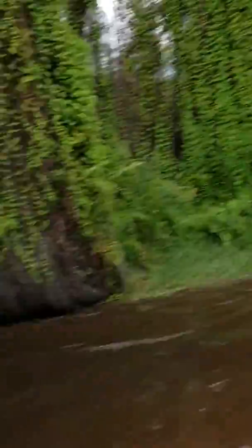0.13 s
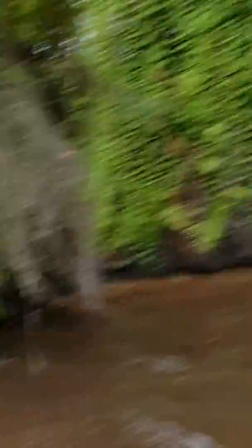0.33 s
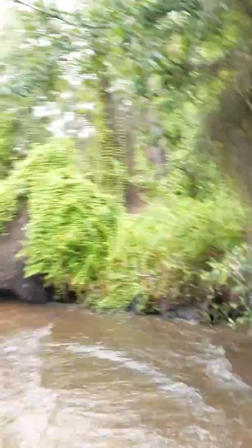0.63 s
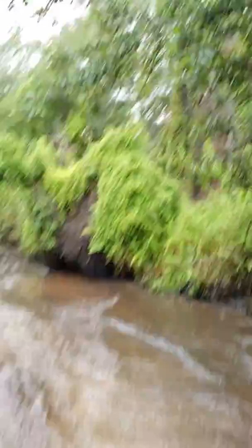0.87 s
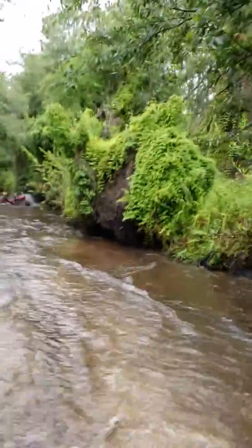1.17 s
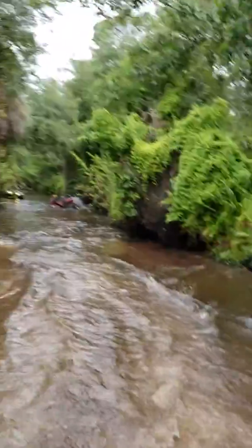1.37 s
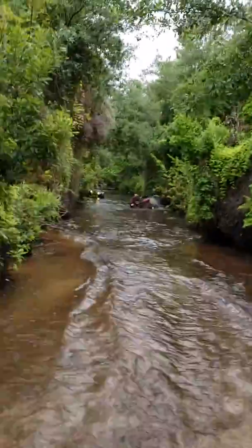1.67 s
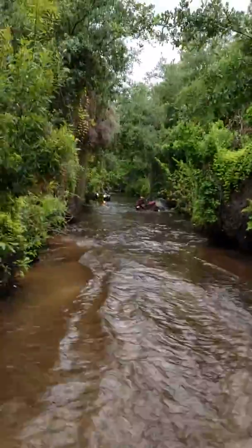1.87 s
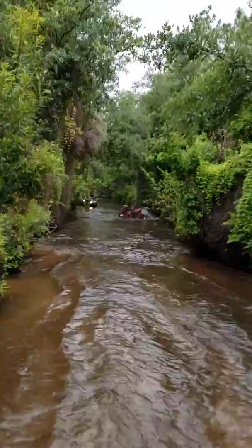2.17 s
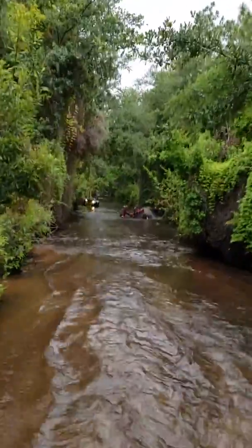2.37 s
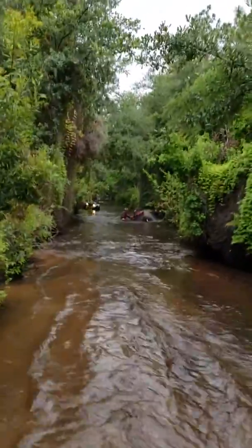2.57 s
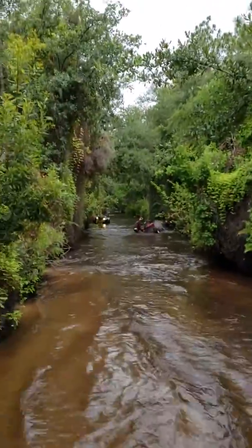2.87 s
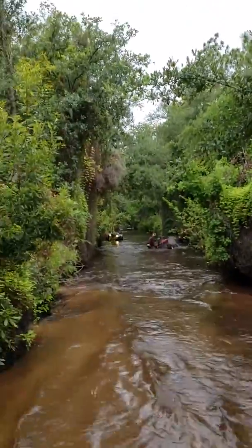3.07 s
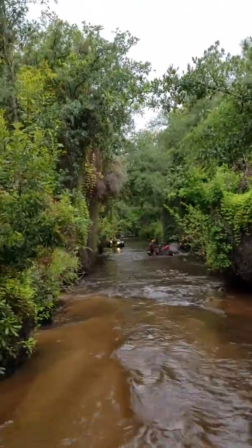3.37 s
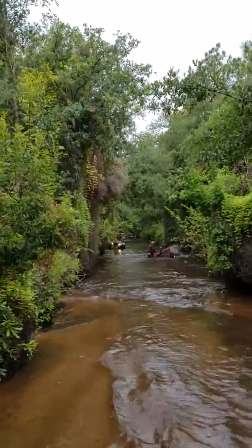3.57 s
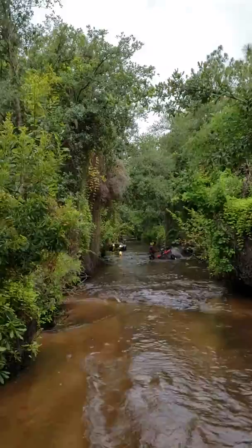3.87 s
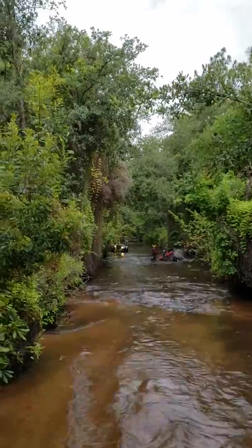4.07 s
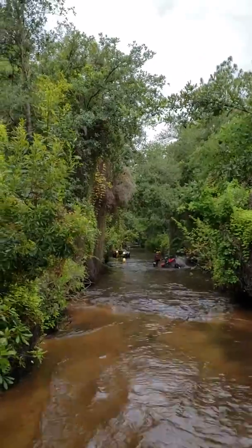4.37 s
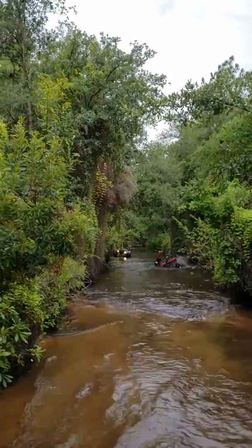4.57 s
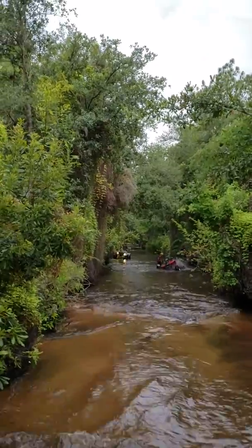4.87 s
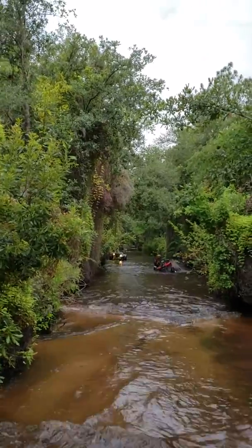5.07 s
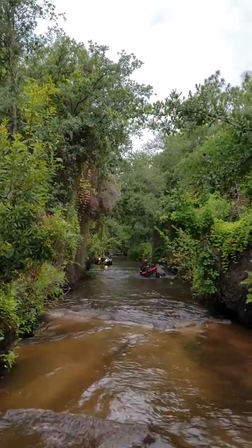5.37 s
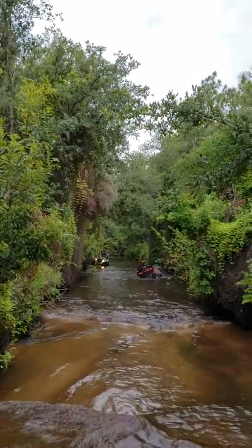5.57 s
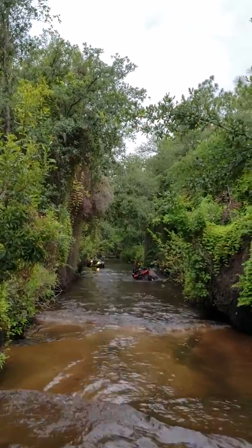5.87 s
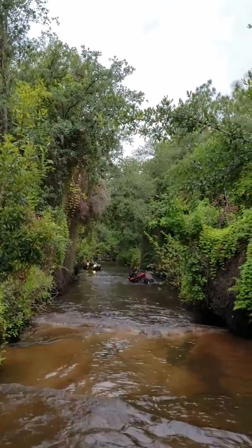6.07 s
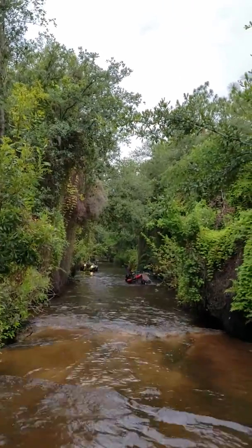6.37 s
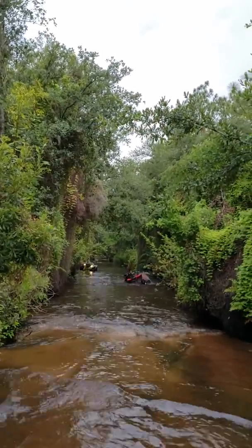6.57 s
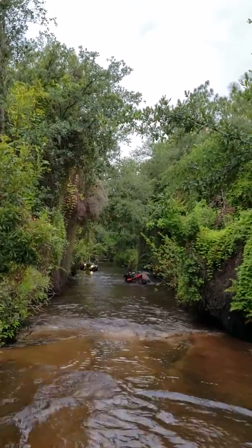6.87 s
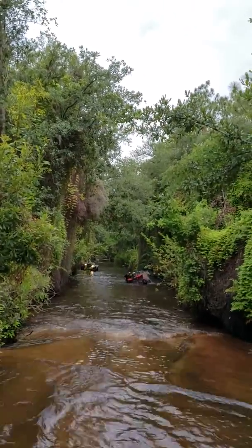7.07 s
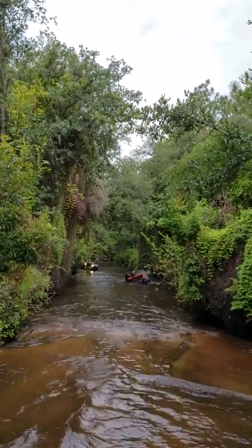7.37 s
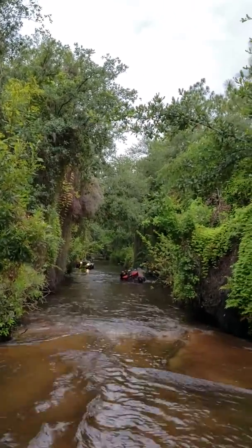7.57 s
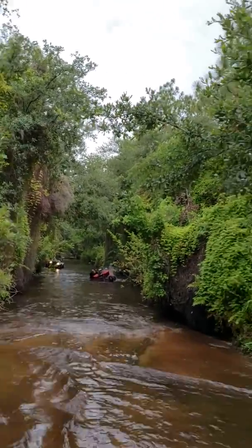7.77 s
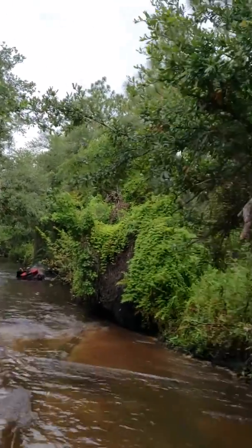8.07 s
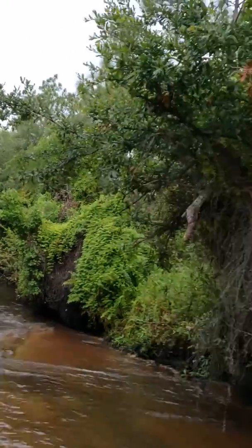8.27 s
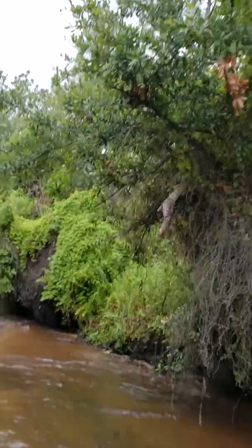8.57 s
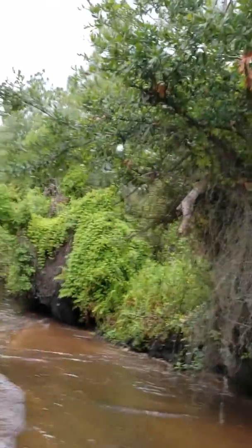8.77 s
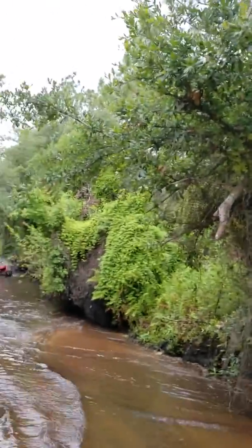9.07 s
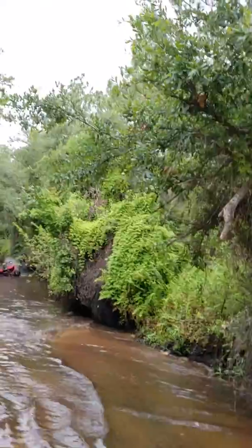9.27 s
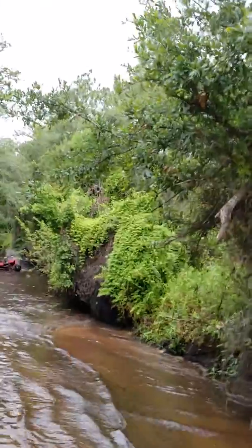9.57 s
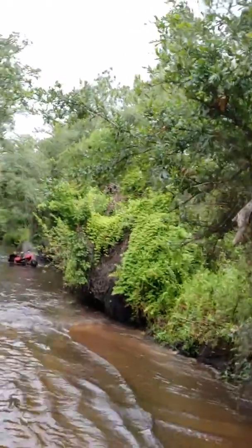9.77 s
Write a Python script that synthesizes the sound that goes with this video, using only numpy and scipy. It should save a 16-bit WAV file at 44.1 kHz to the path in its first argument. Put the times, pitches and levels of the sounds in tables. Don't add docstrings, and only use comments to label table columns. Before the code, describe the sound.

A close quad bike revs briefly with a humming frame and strong spray, then falls by one second to a deep, lumpy idle. A softer far engine putters rapidly behind it. Water spits, slops and splashes scatter around the wheels. Late on the far engine slows to duller, separate pops. Outdoor wooded creek, short bank reflections, two-port phone, both engines slightly right.

```python
import sys
import numpy as np
from scipy import signal
from scipy.fft import rfft, irfft
from scipy.io import wavfile
from scipy.ndimage import uniform_filter1d

SR = 44100
rng = np.random.default_rng(int(sys.argv[2]) if len(sys.argv) > 2 else 0)


def generate_wav(signal):
    frames = np.transpose(np.atleast_2d(signal))
    scaled = np.clip(frames, -1, 1) * 32767
    pcm = np.round(scaled).astype(np.int16)
    wavfile.write(sys.argv[1], SR, pcm)


def rack_gain(trim_db):
    fader = np.asarray(trim_db, float)
    return 10 ** (fader / 20)


N = 437472
T = np.arange(N) / SR
LOADED_RPM = 950

# (time [s], speed [rpm])
NEAR_RPM = [(0.0, 1222.3), (0.4, 1165.9), (0.8, 1126.9), (1.02, 803.1), (1.49, 811.0), (2.15, 742.7),
            (2.56, 775.5), (2.89, 727.1), (3.56, 737.4), (4.04, 691.7), (4.62, 725.1), (5.36, 741.1),
            (6.28, 713.0), (6.72, 773.9), (7.26, 717.7), (8.54, 739.4), (9.05, 677.0), (9.92, 725.3)]
# (time [s], airbox thump level [dB])
NEAR_LOAD = [(0, -50), (.3, -24), (.6, -19.5), (.8, -21.5), (.88, -38), (1.1, -13.5), (2, -14.5),
             (2.9, -17), (3.2, -14), (6.75, -11.5), (6.86, -22), (6.94, -12), (7.02, -21), (7.1, -10),
             (7.18, -19), (7.27, -12), (9.92, -13)]
# (speed [rpm], airbox [Hz], exhaust [Hz])
THUMP_HZ = [(667, 71, 81.5), (1080, 86, 86.5)]
# (order of the crank [1], level [dB], lag [cycles])
HUM = [(3, -19, .1), (4, -22, 0.57), (5, -1, 0.074), (17, -20, 0.3)]
FIRES_AT_TURN = (.9, .94)
# (time [s], exhaust thump level [dB])
STRAYS = [(.873, -30), (1.225, -15.5), (1.593, -18), (2.769, -18), (3.344, -21), (3.839, -25), (4.009, -14),
          (4.182, -9), (4.351, -14), (4.442, -26), (4.768, -24), (5.584, -13), (5.665, -20), (5.748, -19),
          (5.83, -22), (5.913, -10), (5.998, -12), (6.081, -14), (6.412, -18), (7.048, -17), (7.213, -18),
          (7.383, -11), (7.544, -23), (7.716, -20), (8.866, -17), (9.04, -13), (9.389, -12), (9.562, -9),
          (9.729, -10), (9.897, -8)]
# (time [s], speed [rpm])
FAR_RPM = [(0.0, 4773.8), (1.13, 4846.7), (1.69, 4740.3), (2.18, 4914.1), (2.45, 4806.7), (2.94, 4424.9),
           (3.51, 4621.4), (4.23, 4800.4), (4.49, 4780.6), (5.05, 4472.8), (5.63, 4507.2), (6.07, 4408.9),
           (6.62, 4564.6), (6.91, 4428.9), (7.78, 3461.7), (8.4, 3387.2), (9.19, 3657.8), (9.92, 3124.8)]
# (time [s], pop level [dB], pipe echo share [0-1], throttle [0-1], tailpipe facing us [0-1])
FAR_POP = [(0, -35.5, 1, 0.86, 0.9), (.77, -36, 0.73, 0, .1), (1.52, -36, 0.73, 0.3, 0.29),
           (1.9, -37, 0.84, 0.3, 0.24), (2.24, -34.5, 0.5, 0.98, 0.45), (2.73, -32, 0.41, 0.54, 0.2),
           (2.87, -35.5, 0.33, 1, 0.8), (3.04, -32.5, 0.48, 0.6, 0.24), (4.03, -32, 0.58, 0.92, 0.4),
           (4.23, -30.5, 0.43, 1, 0.28), (4.7, -31, 0.48, 0.9, 0.2), (5.25, -29.5, 0.17, 0.94, 0.6),
           (5.33, -29.5, 0.19, 0.6, .8), (5.52, -30.5, 0.39, 0.89, 0.36), (6.66, -30, 0.47, 0.95, 0.5),
           (7.84, -33.5, 0.23, 0.5, 0), (9.25, -28.5, .2, 0.7, 0.85), (9.92, -32.5, 0.12, 0, 0.54)]
# (frequency [Hz], width [Hz], level [dB])
PIPE = [
    (144, 33, -7),
    (202, 51, -12),
    (321.1, 19.1, -8.5),
]
# (frequency [Hz], density [dB per Hz])
ROAR = [(20, -24), (45, 2.5), (100, -11), (200, -5), (300, -16.5), (450, -20), (750, -28), (1100, -32),
        (1650, -33), (2600, -53.5), (4000, -52), (5200, -64)]
# (frequency [Hz], density [dB per Hz])
HISS = [(1470, -1), (2500, -0.5), (2790, -5), (4640, -8.5), (7410, -4.5), (8460, -12), (10500, -9),
        (11700, -3), (12700, -6), (14300, -3), (15200, -3), (16200, -20)]
# (time [s], spray level [dB], wash and roar level [dB])
CHURN = [
    (0, -38.5, -49),
    (.4, -44.5, -45),
    (.85, -42.5, -49),
    (1.21, -49, -49),
    (2.4, -52.5, -53.5),
    (3.4, -50, -48.5),
    (7.6, -50.5, -49.5),
    (8.3, -48.5, -49),
    (9.92, -51, -49),
]
# (time [s], length [s], level over the hiss [dB])
SPLASHES = [(2.46, .02, 7), (2.702, 0.088, 5), (2.998, .03, 2), (3.414, .04, 2.5), (4.3, .1, 0),
            (4.52, .03, 2), (6.8, 0.022, 3.5), (7.987, 0.032, 7.5), (8.3, 0.047, 0), (8.505, .05, -0.5),
            (9.92, 0.033, 9)]
# (time [s], length [s], frequency [Hz], level [dB])
SLOPS = [(0.01, 0.074, 1600, -33.5), (.35, .12, 1560, -41), (.03, 0.31, 2510, -48),
         (0.065, 0.046, 844, -37), (0.327, 0.14, 800, -39.5), (2.702, 0.059, 2530, -55),
         (5.086, .06, 1970, -45.5), (4.3, 0.4, 2560, -56), (5.487, 0.048, 1940, -48),
         (6.795, 0.19, 1630, -46), (8.266, 0.16, 1660, -49), (8.8, 0.32, 1320, -46)]
# (time [s], peak level [dB])
SPITS = [(1.0141, -29), (2.3231, -41), (2.444, -23), (2.5551, -32), (2.6543, -27), (2.6923, -28),
         (2.9442, -38), (3.012, -22), (3.3907, -35), (3.7099, -33), (3.7957, -41), (4.5565, -37),
         (4.8868, -31), (5.3747, -36), (6.313, -28), (7.418, -38), (7.664, -35), (7.8301, -33),
         (7.9443, -32), (8.1094, -29), (8.2761, -40), (8.6467, -39), (8.9016, -30), (9.1635, -37),
         (9.4255, -42), (9.5113, -37), (9.5986, -34), (9.7123, -39)]
# (frequency [Hz], left-right likeness [0-1])
SAME = [(60, 1), (300, 0.96), (700, 0.83), (1400, 0.3), (3000, 0.017), (15000, 0.015)]
# (frequency [Hz], left minus right [dB])
LEAN = [(60, -1.5), (120, -1.0), (240, 0.0), (480, -1.5), (950, -2.0), (1890, -1.5), (3770, -0.5),
        (7520, -2.5), (15000, -5.0)]


def evened(x):
    return x / np.sqrt(np.mean(x ** 2) + 1e-20)


def read(points, hz):
    f, value = np.transpose(points)
    return np.interp(np.log(hz + 1), np.log(f + 1), value)


def curves(rows):
    s, *columns = np.transpose(rows)
    return [np.interp(T, s, c) for c in columns]


def between(ends, share):
    return ends[0] + (ends[1] - ends[0]) * np.clip(share, 0, 1)


def ring(x, hz, width):
    r = np.exp(-np.pi * width / SR)
    return signal.lfilter([1], [1, -r * np.exp(2j * np.pi * hz / SR)], x + 0j).imag


def later(x, ms):
    return np.interp(T - ms / 1000, T, x, left=0)


def thump(dt, hz, length):
    return -np.cos(2 * np.pi * hz * dt) * np.exp(-.5 * (dt * hz / length) ** 2)


def noise(spectrum, patchy_db):
    frames, hz = N // 256 + 5, np.fft.rfftfreq(1024, 1 / SR)
    a, b, c, d, patches = rng.standard_normal((frames, 513, 5)).T
    patches = uniform_filter1d(patches, size=14, axis=0)
    patches = evened(uniform_filter1d(patches, size=10, axis=1))
    same = np.clip(read(SAME, hz), -1, 1)[:, None]
    left, other = a + 1j * b, c + 1j * d
    z = np.array([left, same * left + np.sqrt(1 - same ** 2) * other])
    z *= rack_gain(read(spectrum, hz)[:, None] + patchy_db * patches)
    return evened(signal.istft(z, nperseg=1024, noverlap=768)[1][:, :N])


def crank():
    return np.cumsum(curves(NEAR_RPM)[0]) / 60 / SR + .028


def frame_hum():
    turns = crank()
    hum_db = between((-27, -17.5), (curves(NEAR_RPM)[0] - 720) / 300)
    return sum(rack_gain(hum_db + db) * np.cos(2 * np.pi * (round(k) * turns - lag)) for k, db, lag in HUM)


def wash_roar():
    roar = noise(ROAR, patchy_db=2.0) * rack_gain(curves(CHURN)[1] + 24.5)
    deep = signal.sosfilt(signal.butter(2, 1000, fs=SR, output="sos"), roar)
    return roar - deep * np.clip(1 - (curves(FAR_RPM)[0] / 4400) ** 0.46, 0, 1)


def spray():
    hiss = noise(HISS, patchy_db=1.03)
    top = signal.sosfiltfilt(signal.butter(2, 9000, "high", fs=SR, output="sos"), hiss)
    gusts = uniform_filter1d(rng.standard_normal(N), size=900)
    gusts = evened(uniform_filter1d(gusts, size=900))
    breath = np.exp(-((crank() - .3) % 1) / 0.56)
    drops = rack_gain(4.4 * np.minimum(rng.exponential(1, N), 4.5)) * (rng.random(N) < 90 / SR)
    drops = 0.12 * evened(signal.oaconvolve(drops, np.exp(-np.arange(600) / 77.0))[:N])
    splash_db = sum(db * np.exp(-.5 * ((T - s) / long) ** 2) for s, long, db in SPLASHES)
    puffs = top * (rack_gain(1.1 * gusts + 2.0 * breath + .5 * splash_db - 1.5) - 1)
    level = rack_gain(curves(CHURN)[0] + .4 * splash_db + 3.5 + 2.8 * breath) * (1 + drops)
    hits = spits()
    return (hiss + puffs) * (level + .4 * hits) + .9 * top * hits


def slops():
    froth, out = rng.standard_normal((2, N)), np.zeros((2, N))
    for s, long, hz, db in SLOPS:
        part = abs(T - s) < 3 * long
        swell = np.exp(-.5 * ((T[part] - s) / long) ** 2)
        out[:, part] += rack_gain(db) * swell * evened(ring(froth[:, part], hz, width=105))
    return out


def banks(x):
    t = np.arange(9000) / SR
    taps = rng.standard_normal((2, 9000)) * (rng.random((2, 9000)) < .05)
    taps *= rack_gain(-60 * t / 0.75) * (t > .008)
    return signal.oaconvolve(x[None], taps / np.linalg.norm(taps[0]), axes=1)[:, :N]


def throttle_crack():
    crack_db = curves(NEAR_LOAD)[0] + 10.5
    loaded = curves(NEAR_RPM)[0] > LOADED_RPM
    blows = -rack_gain(crack_db) * loaded * np.diff(np.floor(crank() - .265), prepend=-1)
    crack = ring(blows, 245, width=75) + .4 * ring(blows, 175, width=60)
    return crack + .5 * later(crack, 11.5)


def far_engine():
    rpm = curves(FAR_RPM)[0]
    cycles = np.cumsum(rpm) / 120 / SR + .23
    level_db, pipe, throttle, facing = curves(FAR_POP)
    cool = np.clip((4360 - rpm) / (4360 - 3575), 0, 1)
    echo_ms, water = between((6.328, 6.96), cool), between((0.05, 0.26), cool)
    rasp_hz = between((967, 1200), cool) + 120 * facing
    nasal_db = between((-82.5, -13), cool) + 12.5 * facing
    silencer_db = 0.5 + 0.36 * (level_db + 37)
    upper_db = between((-46.5, -12), throttle) + 3 * cool
    rasp_db, third_db = between((-11, -7.5), throttle), between((-1, -28), facing)

    size, detune = rng.standard_normal((int(cycles[-1]) + 2, 2))[cycles.astype(int)].T
    size = rack_gain(0.54 * size)
    blows = np.diff(np.floor(cycles), prepend=0) * size
    ms = np.arange(-150, 151) / SR * 1000
    front = -np.tanh(ms / 0.4) * np.exp(-.5 * (ms / 1.046) ** 2)
    pop = signal.oaconvolve(blows, front, "same")

    since = T - np.maximum.accumulate(T * (blows > 0))
    warm = 6.3 / echo_ms
    modes = [(hz, width / warm ** 6, db + silencer_db + 3.5 * cool) for hz, width, db in PIPE[:2]]
    modes += [(hz * warm, width / warm ** 14, db + silencer_db - 1.5 * cool) for hz, width, db in PIPE[2:]]
    modes += [(450 * warm, 80, third_db + 4.5),
              (645 * warm ** 0.93, 55 / warm ** 4, upper_db),
              (800 * warm ** .4, 40 / warm ** 4, upper_db - 3.0),
              (rasp_hz * (1 + 0.023 * detune), 160, rasp_db),
              (690 + 20 * detune, 200, nasal_db + 2.5)]
    for hz, width, db in modes:
        pop -= size * rack_gain(db) * np.sin(2 * np.pi * hz * since) * np.exp(-np.pi * width * since)

    puff = np.exp(-(cycles % 1) / 0.17) * size * rng.standard_normal(N)
    puff = evened(ring(puff, 660, width=1400) + ring(puff, 1060, width=190))
    pop += rack_gain(-28.5) * warm ** 7 * puff
    dull = uniform_filter1d(pop, size=8)
    pop += np.clip(pipe, 0, 1) * (later(dull, echo_ms) + 0.047 * later(dull, 2 * echo_ms))
    pop += np.clip(water, 0, 1) * later(dull, echo_ms / 2)
    small_distant = signal.butter(3, [128, 1500], "band", fs=SR, output="sos")
    return rack_gain(level_db + 7) * evened(signal.sosfilt(small_distant, pop))


def airbox():
    turns, rpm, box_db = crank(), curves(NEAR_RPM)[0], curves(NEAR_LOAD)[0]
    speeds, box_hz, _ = np.transpose(THUMP_HZ)
    turn = turns.astype(int)
    chance = rng.standard_normal((turn[-1] + 2, 2))[turn]
    dt = (turns % 1 - .5) * 60 / rpm + .0007 * chance[:, 0]
    uneven_db = box_db + 1.1 * chance[:, 1]
    pulls = rack_gain(uneven_db) * thump(dt, np.interp(rpm, speeds, box_hz), length=1.0)
    overtone_db = uniform_filter1d(uneven_db, size=3000) - 11.0
    return pulls - rack_gain(overtone_db) * np.cos(2 * np.pi * (8 * turns - .1))


def firings():
    turns, rpm, box_db = crank(), curves(NEAR_RPM)[0], curves(NEAR_LOAD)[0]
    n = np.arange(1, int(turns[-1]))
    s = np.interp(n + between(FIRES_AT_TURN, np.interp(n, turns, rpm) > LOADED_RPM), turns, T)
    lit = (n + (s > 4.48)) % 2 == 1
    db = np.where(lit, -11 + 1.5 * rng.standard_normal(len(n)), -99)
    db[(s > .9) & (s < 1.2)] = -99
    loaded = np.interp(s, T, rpm) > LOADED_RPM
    db[loaded] = (-14 + 0.26 * (np.interp(s, T, box_db) + 28))[loaded]
    for at, stray_db in STRAYS:
        db[np.argmin(abs(s - at))] = stray_db
    return zip(s[db > -60], db[db > -60])


def exhaust():
    out, rpm = np.zeros(N), curves(NEAR_RPM)[0]
    speeds, _, pipe_hz = np.transpose(THUMP_HZ)
    for s, db in firings():
        near = slice(max(round((s - .05) * SR), 0), round((s + .05) * SR))
        hz = np.interp(rpm[round(s * SR)], speeds, pipe_hz)
        out[near] += rack_gain(db - 1.96) * thump(T[near] - s, hz, length=0.97)
    return out


def spits():
    hits = np.zeros(N)
    for s, db in SPITS:
        hits[round(s * SR)] = rack_gain(db - 10)
    lag = np.arange(-600, 601)
    return signal.oaconvolve(hits, np.exp(np.where(lag < 0, lag / 21.0, -lag / 120.0)), "same")


def scene():
    near = frame_hum() + throttle_crack() + airbox() + exhaust()
    far = far_engine()
    engines = np.array([later(near, 0.62) + later(far, 0.17), near + far])
    tail = banks(rack_gain(-10.0) * far + rack_gain(-24.5) * near)
    return engines + wash_roar() + spray() + slops() + tail


def band_limit(x):
    return signal.sosfilt(signal.butter(12, 16340, fs=SR, output="sos"), x)


def record(dry):
    hz = np.fft.rfftfreq(N, 1 / SR)
    lean = rack_gain(np.outer([.5, -.5], read(LEAN, hz)))
    bass_cut = 1 / np.sqrt(1 + (37 / (hz + 1)) ** 8)
    top_edge = np.clip((15830 - hz) / 120 + 1, 0, 1)
    heard = irfft(rfft(dry) * lean * bass_cut * top_edge, N)
    return band_limit(.9 * np.tanh(heard / 0.9))


dry = scene()
out = record(dry)
generate_wav(out)
```